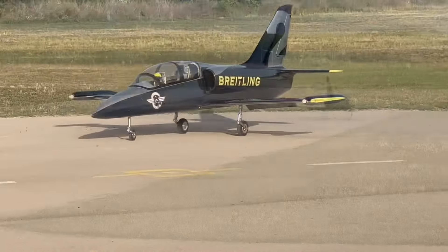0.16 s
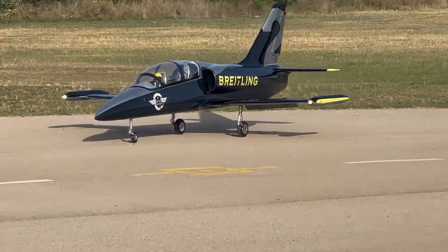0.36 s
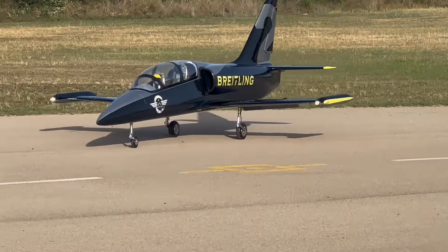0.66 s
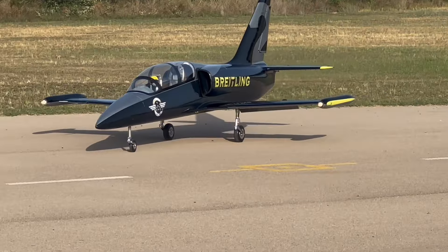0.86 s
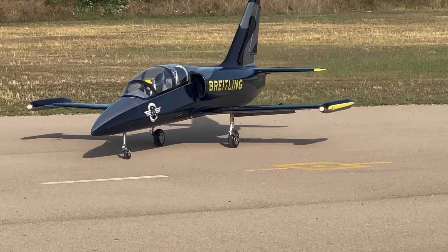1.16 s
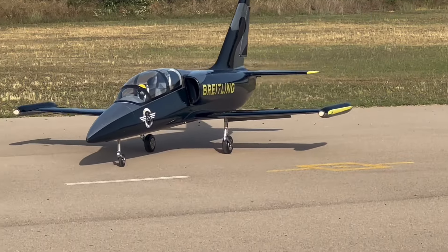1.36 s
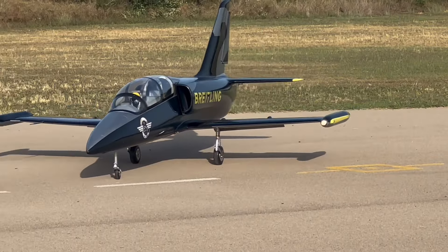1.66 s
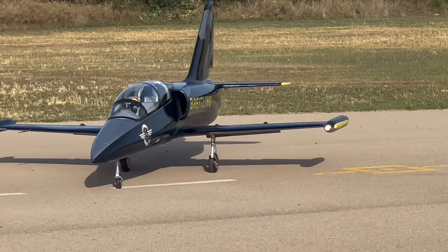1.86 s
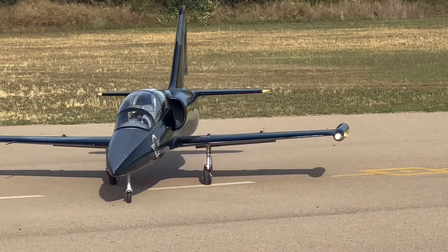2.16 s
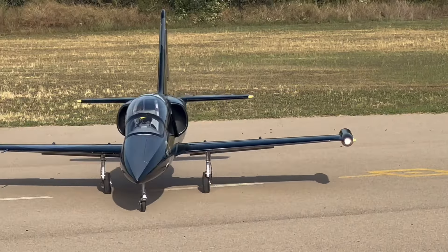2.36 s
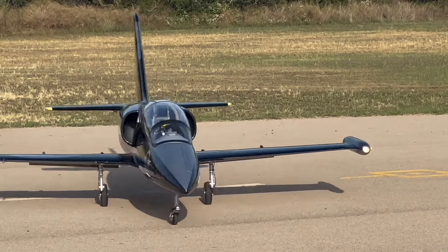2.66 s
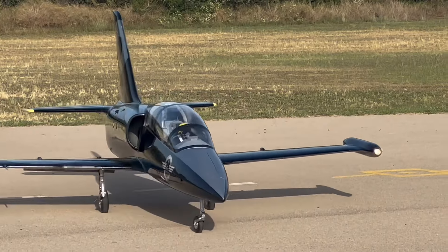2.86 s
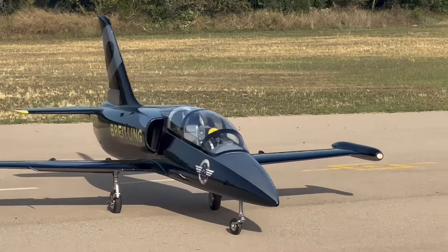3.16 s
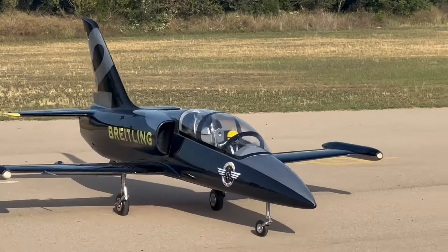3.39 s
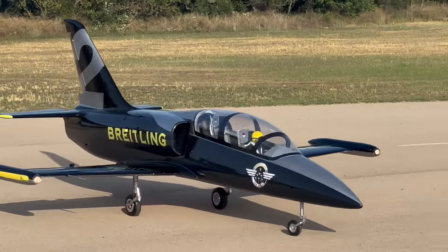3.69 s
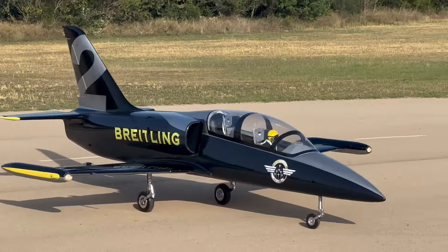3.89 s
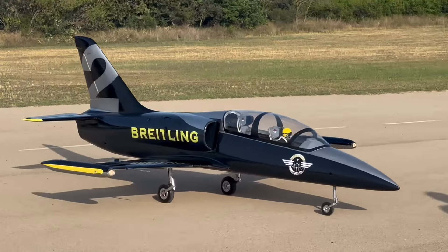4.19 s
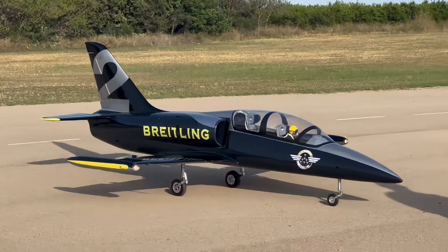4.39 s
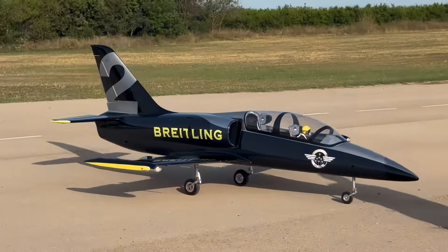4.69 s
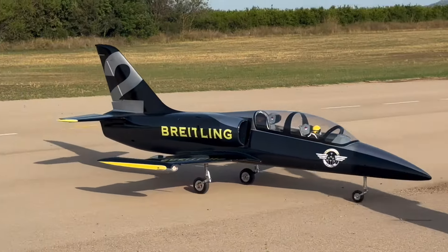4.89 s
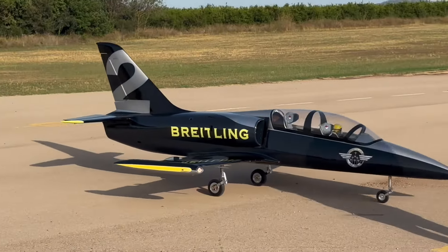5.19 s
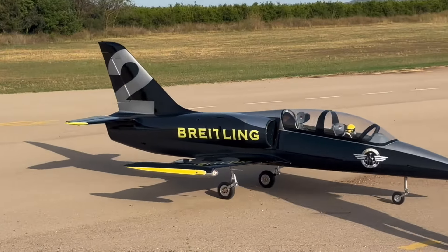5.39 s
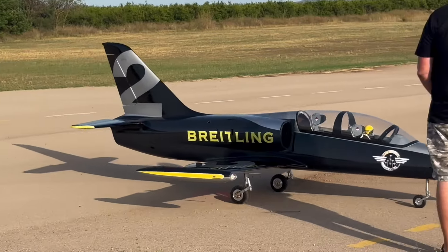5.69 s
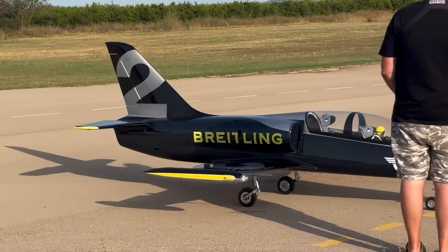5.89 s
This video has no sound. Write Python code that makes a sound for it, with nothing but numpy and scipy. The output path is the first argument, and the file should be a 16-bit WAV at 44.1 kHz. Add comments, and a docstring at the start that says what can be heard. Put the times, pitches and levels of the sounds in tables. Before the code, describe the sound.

A small jet turbine's piercing whine swells, then fades while slowly falling in pitch, over airy intake rush, early wind thuds and a late low exhaust roar.

```python
"""A falling turbine whine, swelling and fading, over intake rush, late exhaust roar and wind thuds, most of them early.
A model jet taxis past, turning its nose through the microphone while its turbine spools down.
Whine: four shaft orders and a faint bearing tone, beamed; the waves of the two intakes cancel or add at some moments.
Air noises: coloured, flickering noise through beams that turn with the jet, plus narrow drifting duct resonances.
Wind: gust-shaped rumble and crackle, with separate eddies as push-pull pressure pulses."""
import sys
import numpy as np
from scipy import signal
from scipy.fft import rfft, irfft
from scipy.io import wavfile
from scipy.ndimage import map_coordinates

SR = 44100
rng = np.random.default_rng(int(sys.argv[2]) if len(sys.argv) > 2 else 0)


def output_pcm(signal):
    """Save a mono or channel-first signal as 16-bit PCM at the path in sys.argv[1].

    Samples are clipped to [-1, 1] before scaling.
    """
    pcm = np.clip(np.atleast_2d(signal).T, -1, 1) * 32767
    wavfile.write(sys.argv[1], SR, np.round(pcm).astype(np.int16))


N = 266805
TIME_S = np.arange(N) / SR
BINS_HZ = np.arange(N // 2 + 1) * SR / N

# Wind strength over the breeze. Each row: centre in seconds, level in dB, half length in seconds (to 1/e of power).
GUSTS = [(0.34, -33.5, 0.25), (0.75, -33, 0.3), (1.15, -35.5, 0.18), (1.497, -35, 0.17), (1.87, -39, 0.089),
         (2.17, -36.5, 0.32), (3.137, -43, 0.23), (3.75, -41, 0.15), (4.93, -43, 0.15), (5.7, -40.5, 0.19)]
BREEZE_DB = -50
# Eddies striking the microphone. Each row: time in seconds, level in dB, push time in seconds (long thuds, short knocks).
BUFFETS = [(.079, -16.5, 0.00051), (.106, -27, 0.00078), (.163, -28.5, 0.00097), (0.186, -25, 0.00032),
           (.231, -28, 0.0005), (.277, -25, 0.00057), (.297, -27, 0.00042), (0.323, -22.5, 0.00064),
           (.343, -27.5, 0.00062), (0.384, -28, 0.0016), (.433, -29.5, 0.00055), (.474, -28.5, 0.00029),
           (0.487, -28.5, 0.00029), (.516, -35.5, 0.00037), (0.583, -20, 0.0013), (0.605, -27, 0.0027),
           (.653, -29, 0.00066), (0.684, -25, 0.00092), (.694, -16.5, 0.00032), (.704, -25.5, .0006),
           (0.733, -25, 0.0032), (.75, -28, 0.00091), (0.78, -24, 0.00072), (.806, -30.5, 0.0012),
           (0.838, -22, 0.00047), (0.886, -26, 0.00072), (.911, -19, 0.00065), (.961, -28, 0.00049),
           (.981, -30, 0.00046), (1.027, -25, 0.00088), (1.151, -25.5, 0.0015), (1.199, -28, 0.00069),
           (1.234, -26, 0.00054), (1.264, -21, 0.00039), (1.284, -21, 0.00039), (1.365, -25.5, 0.00059),
           (1.379, -19.5, 0.00048), (1.386, -21.5, 0.002), (1.405, -25.5, 0.0024), (1.432, -26, 0.00083),
           (1.448, -29, 0.0027), (1.489, -26.5, 0.0003), (1.533, -24.5, 0.00078), (1.549, -25.5, 0.00059),
           (1.573, -30, 0.00071), (1.586, -19, 0.00049), (1.611, -23, 0.00048), (1.619, -30, 0.00043),
           (1.624, -23, 0.00044), (1.648, -25, 0.00062), (1.674, -22, 0.00067), (1.77, -21.5, 0.0013),
           (1.793, -28, 0.00039), (1.832, -28.5, 0.0024), (1.891, -28, .0013), (2.032, -26.5, 0.00056),
           (2.075, -26.5, 0.00059), (2.111, -26, 0.00055), (2.145, -28.5, 0.00046), (2.216, -25.5, 0.00055),
           (2.238, -27.5, 0.00069), (2.273, -22.5, 0.00037), (2.284, -27.5, 0.0007), (2.303, -28, 0.00027),
           (2.451, -28.5, .0006), (2.629, -26, .0005), (2.941, -27, 0.00071), (3.175, -28, 0.00089),
           (3.271, -32, .0006), (3.4, -29.5, 0.00028), (3.52, -30, 0.0004), (3.533, -32, 0.0012),
           (3.679, -33.5, 0.00078), (3.788, -33, 0.00083)]

# Noise spectra, scaled to rms 1 in use. Each row: frequency in Hz, relative density in dB.
WIND_SPECTRUM = [(25, -37.5), (48, 1), (75, 2.5), (130, -3), (300, -13), (600, -26.5), (1100, -27),
                 (2500, -35.5)]
EDDY_SPECTRUM = [(40, -27.5), (150, 1.5), (700, -10.0), (1200, -23.0), (3000, -37.5), (15000, -73.0)]
FIELD_SPECTRUM = [(30, -25.5), (120, 9.5), (300, 17.5), (700, -34.0), (1700, -13), (2600, -16.5),
                  (12000, -44), (16000, 0.5)]
ROAR_SPECTRUM = [(30, -17.5), (70, -7), (150, -18), (240, 1.5), (300, -4), (360, -5), (430, -14),
                 (580, -16), (720, -13.5), (950, -18), (1180, -30), (1500, -24.5), (2500, -23.5),
                 (5000, -32), (16000, -54)]
RUSH_SPECTRUM = [(200, 6.5), (700, -7.5), (1000, 1), (1220, 0.5), (1500, -3.5), (1700, -2), (1950, -1),
                 (2500, -16.5), (3000, -23), (5000, -9.5), (12000, -26)]
INTAKE_SPECTRUM = [(1800, -37.5), (2600, -16), (3200, -4.5), (3750, -1.5), (4350, -1.5), (4900, -5.5),
                   (5600, -16.5), (7200, -8), (8400, -1), (9500, -34), (16000, -9)]
HISS_SPECTRUM = [(1000, -12), (2550, -9), (2950, -5.5), (3400, -9), (4200, -5.5), (4700, -7), (5600, -4),
                 (6600, 0), (8200, 3.5), (9500, .5), (11000, 2.5), (12800, -3), (14200, -2.5), (16000, -5)]
FIZZ_SPECTRUM = [(10000, -44.5), (12000, -3), (14000, 2.5), (16000, -15.5)]

# Sliding of two spectra. Each row: time in seconds, factor on the listed frequencies.
ROAR_SLIDE = [(0, 0.93), (3.1, 0.92), (4.2, 1.01), (5.0, .99), (6.05, 0.94)]
INTAKE_SLIDE = [(0, 1.14), (1.5, 0.92), (2.2, 0.99), (2.65, 0.96), (3.0, .8), (3.6, 0.72), (6.05, 1.21)]
# Sag and swell of the low roar. Each row: time in seconds, change in dB.
ROAR_CHANGE = [(0, -1), (3.3, 0), (3.75, -2.5), (4.5, 1.5), (5.2, -2), (5.55, 1), (6.05, 0.5)]

# Extra travel time of the runway bounce. Each row: time in seconds, delay in seconds.
GROUND_LAG = [(0, 0.001), (1, 0.0011), (2.6, 0.001355), (6.05, 0.0013)]
# Phase lead of the left channel over the right. Each row: frequency in Hz, phase in radians.
PORT_PHASE = [(20, .2), (600, .2), (1000, 0), (1480, 0), (1680, -2.1), (1920, 0), (2780, 0), (2980, .75),
              (4100, .6), (4300, 0), (6200, 0), (6860, .55), (8000, 5.6), (8350, 5.9), (9450, 5.5),
              (9850, 3.8), (11500, 3), (13900, 0), (14700, 0), (15700, -1.1)]
# Nose direction, 0 = straight at the microphone. Each row: time in seconds, angle in degrees.
HEADING = [(0, -62), (1, -48), (2, -20), (2.5, 0), (3.5, 42), (4, 56), (6.05, 78)]

# Beams. Each row: level inside in dB, level outside in dB, aim in degrees, half width in degrees, edge steepness.
# Shaft orders 1-4; the fourth is silent inside its beam.
ORDER_BEAMS = [(-26, -44, -6.5, 12.1, 2.9), (-9.5, -32, -5, 49.5, 17.3), (-25.5, -44, -2, 37, 2.9),
               (-84, -33.5, -20.5, 67.4, 110)]
# Bearing tone; its negative steepness puts the outside level at the aim and the inside level far from it.
BEARING_BEAM = (-45.5, -72, 53.5, 6.5, -1)
# Air noises at the starting shaft speed.
ROAR_BEAM = (-46, -21.5, -41.5, 104, 7.5)
RUSH_BEAM = (-41.5, -45.5, -25, 63, 2.5)
INTAKE_BEAM = (-33.5, -46.5, -1.5, 35, 5)
HISS_BEAM = (-39.5, -33.5, 4, 45, 15.5)
FIZZ_BEAM = (-39, -66, -3, 45.5, 9.5)
# Scattered against direct whine, orders 2-4 and bearing tone; grows once the intakes face away.
SCATTER_BEAM = (-23, -7, -11.5, 53, 18)

# Moments at which waves cancel or add.
# Each row: time in seconds, shaft order (0 = hiss), change in dB, half width in seconds (to 1/e).
NULLS = [(0.05, 0, -15.5, 1), (1.72, 0, -10, 0.055), (3.75, 0, 0.5, 0.46), (1.33, 1, -7.5, 0.14),
         (2.02, 1, -20, 0.1), (2.406, 1, -30, 0.52), (2.71, 1, 4.5, 0.059), (2.95, 1, -5.5, 0.13),
         (3.45, 1, -32, 0.31), (3.3, 1, -1.5, .1), (3.68, 1, 3.5, 0.063), (4.937, 1, -28, 0.24),
         (5.81, 1, -10.5, 0.28), (.07, 2, -5.5, 0.31), (.205, 2, 4, 0.033), (1.03, 2, -4, 0.21),
         (1.22, 2, -6, 0.6), (1.847, 2, -14, 0.14), (2.02, 2, -21.5, 0.11), (2.13, 2, 1, 0.046),
         (2.249, 2, -6, 0.083), (2.503, 2, -18.5, 0.057), (2.736, 2, -22, 0.082), (2.82, 2, 1.4, .04),
         (2.941, 2, -8.5, 0.11), (3.136, 2, -23, 0.072), (3.3, 2, -5, 0.12), (3.49, 2, -5, 0.08),
         (3.625, 2, -12.5, 0.048), (3.652, 2, -37, 0.012), (3.73, 2, -6, 0.05), (3.779, 2, -24, 0.0098),
         (3.83, 2, 7, 0.022), (3.95, 2, -5.5, 0.14), (4.3, 2, -6, 0.084), (5.26, 2, 6.5, 0.055),
         (5.72, 2, -5, .06), (.763, 3, -50, 0.07), (1.169, 3, -7, 0.089), (1.72, 3, -11.5, 0.16),
         (1.95, 3, 3, .05), (2.2, 3, -3.5, .1), (2.53, 3, -11.5, 0.52), (2.8, 3, -11, .04),
         (2.945, 3, -21, 0.15), (3.03, 3, 5.5, 0.05), (3.2, 3, -6, .06), (3.53, 3, -8, .08),
         (3.76, 4, 7.5, 0.05), (4.0, 4, -15, 0.042), (4.13, 4, 6, .04), (4.3, 4, -6, 0.57),
         (4.75, 4, -22, 0.081), (4.86, 4, 6, 0.056), (5.24, 4, 2.5, .07), (5.0, 4, -10, 0.11),
         (5.7, 4, -13, 0.22)]
# Air resonances of ducts and tailpipe.
# Each row: frequency at the start in Hz, drift in Hz per s, half width in Hz, level in dB, aim in degrees,
# half width of the aim in degrees.
DUCT_MODES = [(232, -0.5, 70, -45.5, 34.5, 18), (399, -0.5, 31, -57.5, -4, 35),
              (492, 0, 36, -49.5, 76.5, 8.2), (720, 0, 45, -52, -10.5, 25),
              (910, -0.5, 95, -51.5, 71.5, 14), (890, -0.5, 44, -51.5, -61, 9),
              (998, -0.5, 170, -52.5, 7.5, 10), (1270, 70, 110, -50.5, -22.5, 42),
              (2060, -80, 90, -52, -37.5, 16), (2292, -130, 90, -51.5, -46.5, 10),
              (2570, -60, 110, -54.5, -30.5, 9), (2550, -0.5, 170, -56, 30, 5.5),
              (3140, 0, 140, -48, 22.5, 5.1), (4204, -21, 610, -42, -15.5, 9.5),
              (4125, -19.5, 270, -47.5, 17, 12)]

SHAFT_HZ, SPOOL_DOWN_PER_S = 4486, .0361
IDLE_S, IDLE_BLEND_S, IDLE_EASE_HZ_PER_S = 5.344, .15, 35.7
TAXI_M_S, PASSES_S, PASS_WIDTH_S, SOUND_M_S = 1.5, 4.132, .353, 343
BEARING_ORDER = 2.143
FLOW_POWER = 4  # air noise pressure grows with this power of shaft speed
TOP_HZ = 15900


def undb(db):
    """Decibels to gain."""
    return 10 ** (np.asarray(db) / 20)


def curve(rows):
    """Rows (s, value) joined by straight lines."""
    return np.interp(TIME_S, *np.transpose(rows))


def unit(x):
    """Scale to rms 1."""
    return x / np.sqrt(np.mean(x ** 2))


def walk(hz):
    """Random wavering of rms 1, mostly slower than hz."""
    return unit(irfft(rfft(rng.standard_normal(N)) / (1 + (BINS_HZ / hz) ** 4), N))


def colour(x, spectrum):
    """Shape x by a spectrum drawn over log frequency, at rms 1."""
    hz, db = np.transpose(spectrum)
    gain = undb(np.interp(np.log(BINS_HZ + 1), np.log(hz), db))
    gain = gain * BINS_HZ / (BINS_HZ + 10)  # no DC
    return unit(irfft(rfft(x) * gain, N))


def turbulence(spectrum, flicker_db, flicker_hz):
    """Flow noise whose strength flickers as eddies pass."""
    flicker = undb(flicker_db * walk(flicker_hz))
    return colour(rng.standard_normal(N) * flicker, spectrum)


def read(x, seconds):
    """The looped signal x at moving times, read between its samples."""
    return map_coordinates(x, [seconds * SR], order=3, mode="grid-wrap")


def beam(inside_db, outside_db, aim_deg, width_deg, steepness):
    """Gain towards the microphone of a beam that turns with the jet."""
    off_aim = np.abs((curve(HEADING) - aim_deg) / width_deg)
    inside = 1 / (1 + off_aim ** steepness)
    return undb(outside_db + (inside_db - outside_db) * inside)


def cancelling(order):
    """Gain of a shaft order, or the hiss, as its nulls and lobes sweep over the microphone."""
    power = np.ones(N)
    for s, row_order, db, width_s in NULLS:
        if round(row_order) == order:
            power = power * (1 + (undb(db) ** 2 - 1) * np.exp(-((TIME_S - s) / width_s) ** 2))
    return np.sqrt(power)


def shaft_hz():
    """Shaft speed as heard: exponential spool-down, easing near idle, with the Doppler shift of the pass."""
    ease = IDLE_EASE_HZ_PER_S * IDLE_BLEND_S * np.logaddexp(0, (TIME_S - IDLE_S) / IDLE_BLEND_S)
    doppler = 1 - TAXI_M_S / SOUND_M_S * np.tanh((TIME_S - PASSES_S) / PASS_WIDTH_S)
    return (SHAFT_HZ * np.exp(-SPOOL_DOWN_PER_S * TIME_S) + ease) * doppler


def airflow(shape):
    """Gain of an air noise: its beam, weaker as the shaft slows."""
    return beam(*shape) * (shaft_hz() / SHAFT_HZ) ** FLOW_POWER


def field_noise(level_db=-52.0):
    """Steady coloured noise of the open field."""
    return undb(level_db) * colour(rng.standard_normal(N), FIELD_SPECTRUM)


def gusts():
    """Strength of the wind: smooth swells whose powers add to the breeze."""
    power = undb(BREEZE_DB) ** 2
    for s, db, length_s in GUSTS:
        power = power + undb(db) ** 2 * np.exp(-((TIME_S - s) / length_s) ** 2)
    return np.sqrt(power)


def port_eddies(level_db=-13.5):
    """Flickering wind rumble at one microphone port, following the gusts."""
    return gusts() * undb(level_db) * turbulence(WIND_SPECTRUM, flicker_db=4.5, flicker_hz=30)


def wind(swirl_s=0.0063, swirl_db=-13, crackle_db=-9):
    """Gusty rumble and crackle of eddies; strong ones push and pull the pressure within a short noisy swirl."""
    rumble = turbulence(WIND_SPECTRUM, flicker_db=2.5, flicker_hz=28.6)
    crackle = turbulence(EDDY_SPECTRUM, flicker_db=5.5, flicker_hz=80)
    out = gusts() * (rumble + undb(crackle_db) * crackle)
    swirl = colour(rng.standard_normal(N), EDDY_SPECTRUM)
    for s, db, push_s in BUFFETS:
        age_s = TIME_S - s
        near = np.abs(age_s) < .05
        u = age_s[near] / push_s
        push = u * np.exp((1 - u ** 2) / 2)  # peaks of -1 and +1
        fade = np.exp(-np.abs(age_s[near]) / swirl_s)
        out[near] += undb(db) * (0.86 * push + undb(swirl_db) * swirl[near] * fade)
    return out


def surroundings(x, return_db=-13, decay_s=0.011):
    """Diffuse return from grass and bushes: a decaying noise tail, drawn afresh on each call."""
    tail = rng.standard_normal(SR // 2) * np.exp(-TIME_S[:SR // 2] / decay_s)
    return undb(return_db) * signal.fftconvolve(x, tail / np.linalg.norm(tail))[:N]


def reflections(x, ground_db=-13, ground_hz=5000, airframe_db=-19, drift_per_s=0.0147, short_hz=800, count=7):
    """The rough runway echoes all but the top, wings and body only short waves; moving delays shift the combs."""
    dull = irfft(rfft(x) / (1 + (BINS_HZ / ground_hz) ** 2), N)
    out = x + undb(ground_db) * read(dull, TIME_S - curve(GROUND_LAG))
    short = signal.sosfilt(signal.butter(2, short_hz, "high", fs=SR, output="sos"), x)
    lags_s = rng.uniform(0.001996, .011, count)
    for lag_s, side in zip(lags_s, rng.choice([-1, 1], count)):
        moving_lag_s = lag_s * (1 + side * drift_per_s * TIME_S)
        out = out + undb(airframe_db) * read(short, TIME_S - moving_lag_s)
    return out / np.sqrt(1 + undb(ground_db) ** 2 + count * undb(airframe_db) ** 2)


def duct_modes(steepness=5):
    """Breathy resonances, narrow noise on drifting carriers, sweeping past one after another as the jet turns."""
    out = 0
    for hz, drift_hz_per_s, width_hz, db, aim_deg, spread_deg in DUCT_MODES:
        phase = 2 * np.pi * np.cumsum(hz + drift_hz_per_s * TIME_S) / SR
        band = unit(walk(width_hz) * np.cos(phase) + walk(width_hz) * np.sin(phase))
        off_aim = np.abs((curve(HEADING) - aim_deg) / spread_deg)
        out = out + band * undb(db) / np.sqrt(1 + off_aim ** steepness)
    return out


def exhaust():
    """The low roar of the tailpipe and the rush of the jet mixing behind it."""
    flow = turbulence(ROAR_SPECTRUM, flicker_db=1.2, flicker_hz=25)
    slid = read(flow, np.cumsum(curve(ROAR_SLIDE)) / SR)
    roar = airflow(ROAR_BEAM) * undb(curve(ROAR_CHANGE)) * slid
    rush = airflow(RUSH_BEAM) * turbulence(RUSH_SPECTRUM, flicker_db=1.36, flicker_hz=39)
    return roar + rush


def intakes():
    """Air drawn through resonant ducts and finest fizz, strongest nose-on; compressor hiss, stronger off the nose."""
    flow = turbulence(INTAKE_SPECTRUM, flicker_db=1.5, flicker_hz=25)
    ducts = airflow(INTAKE_BEAM) * read(flow, np.cumsum(curve(INTAKE_SLIDE)) / SR)
    hiss = airflow(HISS_BEAM) * cancelling(0) * turbulence(HISS_SPECTRUM, flicker_db=.3, flicker_hz=15)
    fizz = airflow(FIZZ_BEAM) * turbulence(FIZZ_SPECTRUM, flicker_db=2.0, flicker_hz=30)
    return ducts + hiss + fizz


def partial(phase, scatter, flutter_hz=52, skirt_hz=130, skirt_db=-13):
    """A tone: a direct wave plus waves scattered by the hot, moving air."""
    slow = walk(flutter_hz) + 1j * walk(flutter_hz)
    fast = walk(skirt_hz) + 1j * walk(skirt_hz)
    wave = np.sqrt(2) + scatter * (slow + undb(skirt_db) * fast)
    return np.real(wave * np.exp(1j * phase)) / np.sqrt(1 + scatter ** 2)


def whine(first_scatter_db=-12):
    """The first four orders of the shaft and a faint bearing tone between them, all locked to its speed."""
    phase = 2 * np.pi * np.cumsum(shaft_hz()) / SR
    scatter = beam(*SCATTER_BEAM)
    out = beam(*BEARING_BEAM) * partial(BEARING_ORDER * phase, scatter)
    for order, shape in enumerate(ORDER_BEAMS, 1):
        order_scatter = scatter if order > 1 else undb(first_scatter_db)
        out = out + beam(*shape) * cancelling(order) * partial(order * phase, order_scatter)
    return out


def scene():
    """Jet and main wind reach both channels equally loud, shifted in phase; each port adds eddies, echo, field noise."""
    flow = reflections(exhaust() + intakes()) + duct_modes()
    shared = rfft(whine() + flow + wind())
    lead = np.exp(.5j * np.interp(BINS_HZ, *np.transpose(PORT_PHASE)))  # half the phase each way
    channels = []
    for shift in (lead, lead.conj()):
        arriving = irfft(shared * shift, N)
        channels.append(arriving + surroundings(flow) + port_eddies() + field_noise())
    return np.array(channels)


def record(dry):
    """Steep zero-phase elliptic low-pass at TOP_HZ."""
    return signal.sosfiltfilt(signal.ellip(12, .05, 70, TOP_HZ, fs=SR, output="sos"), dry)


dry = scene()
out = record(dry)
output_pcm(out)
```